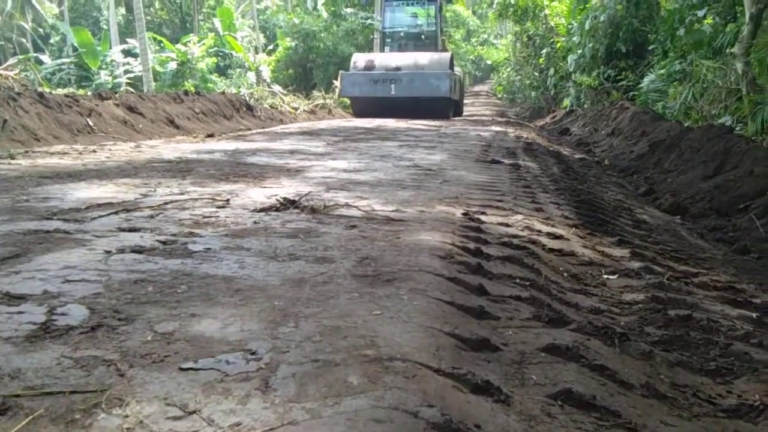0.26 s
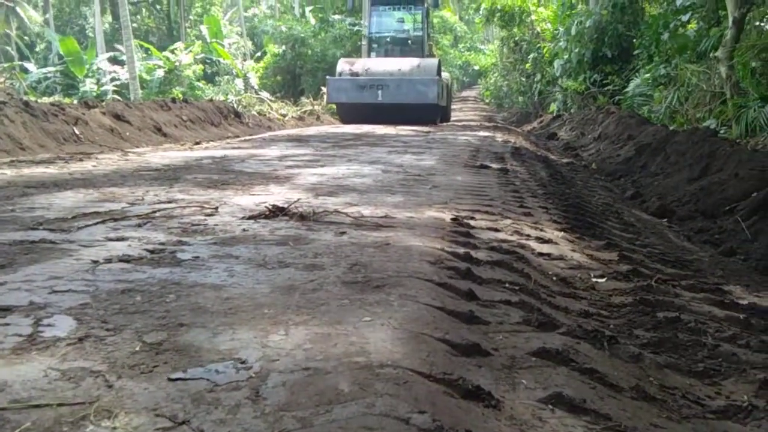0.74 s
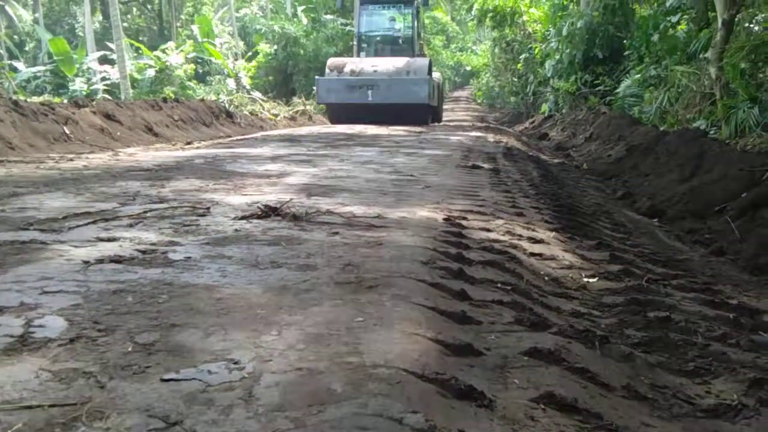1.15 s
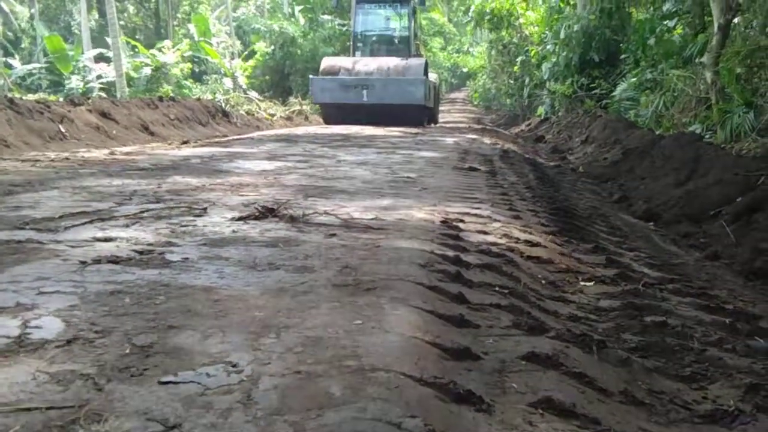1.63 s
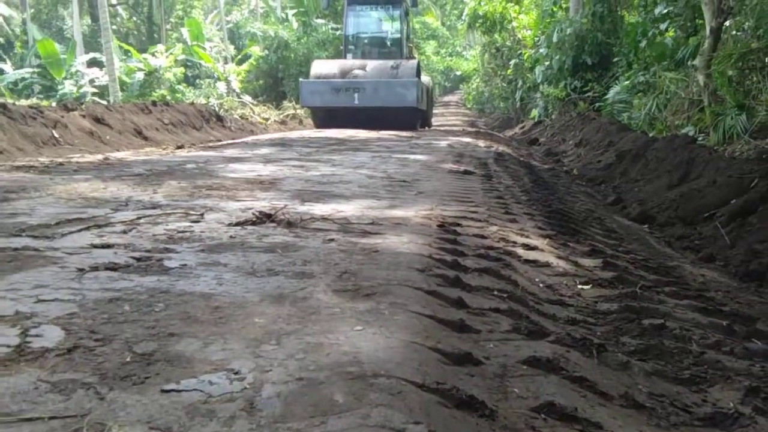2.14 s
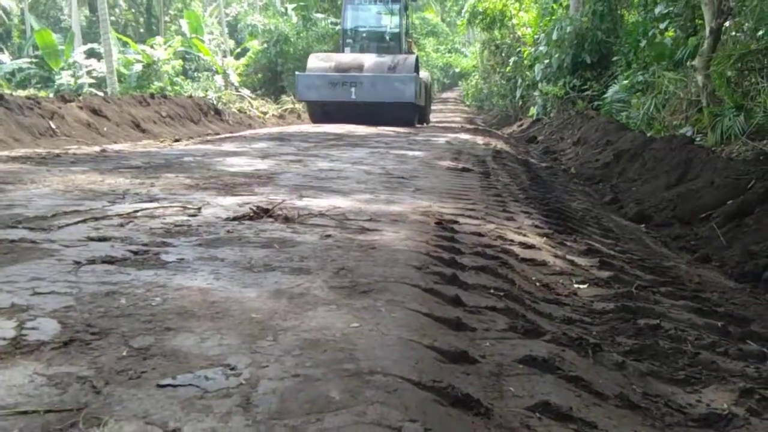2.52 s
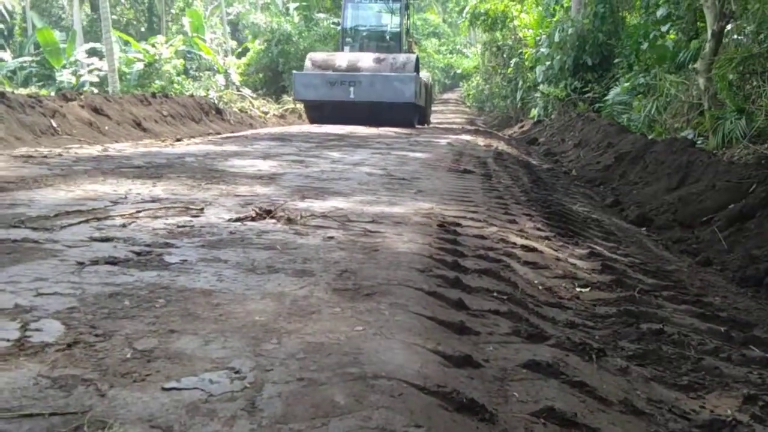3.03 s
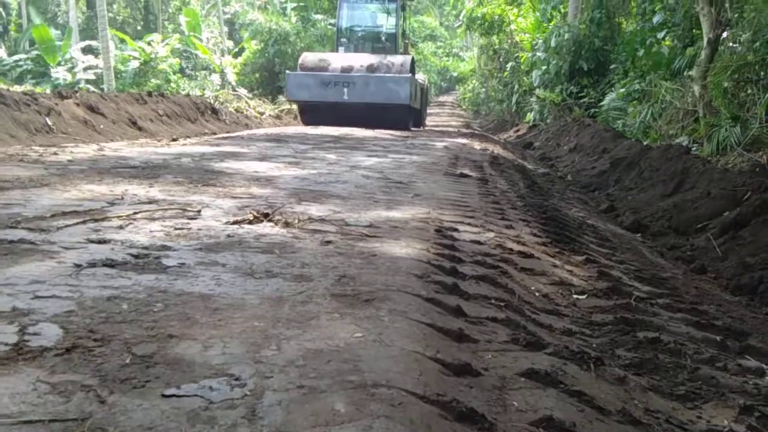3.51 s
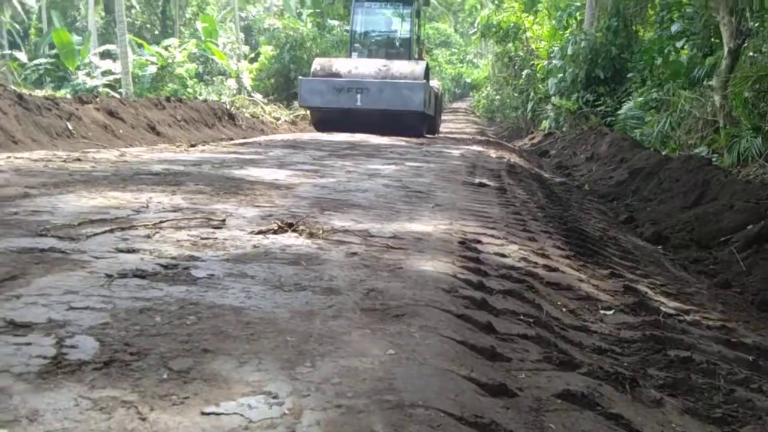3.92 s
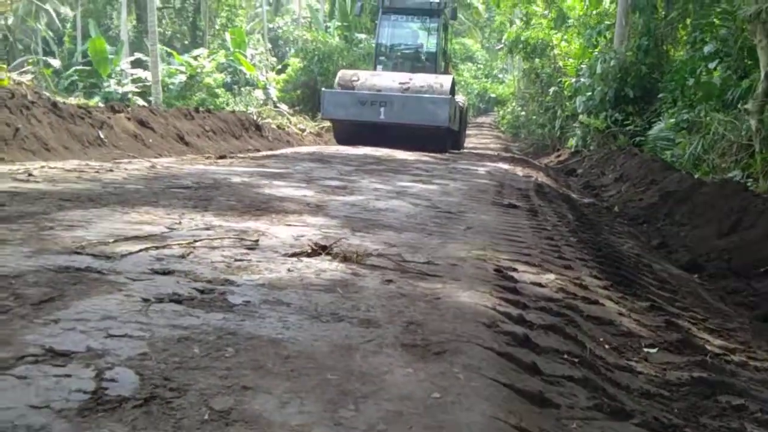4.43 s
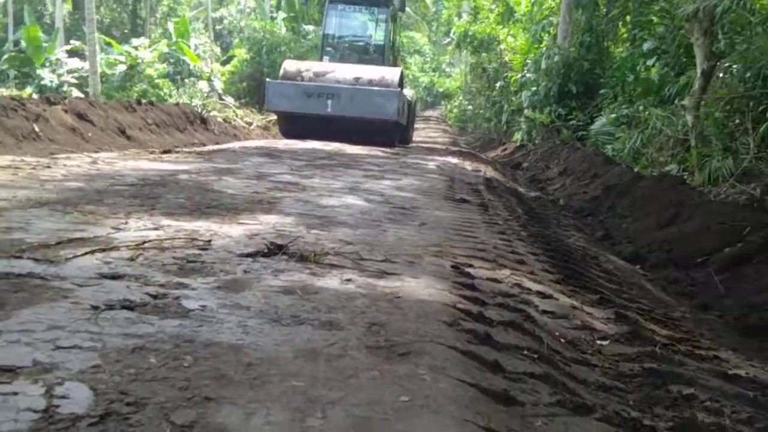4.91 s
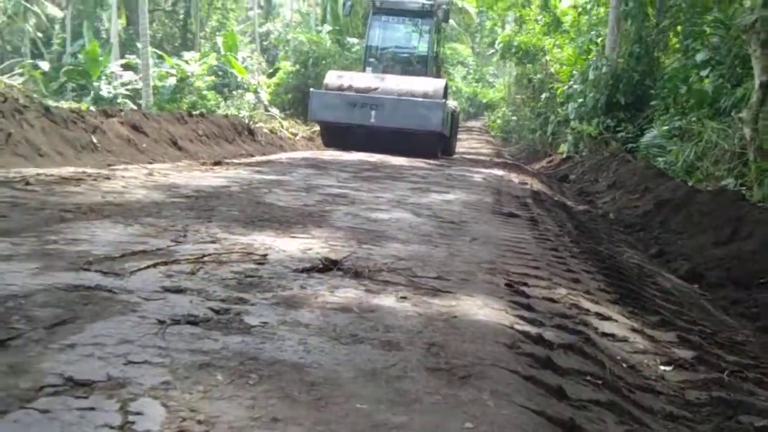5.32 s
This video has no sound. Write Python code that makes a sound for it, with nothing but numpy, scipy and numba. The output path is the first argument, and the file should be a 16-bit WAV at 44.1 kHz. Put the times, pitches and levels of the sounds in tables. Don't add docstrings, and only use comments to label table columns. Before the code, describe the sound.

A heavy vibratory roller is already running at 0 s, about twenty metres away on an open dirt road between trees. A deep, nearly pure diesel hum holds one low pitch with tiny wavering; beneath it the drum throbs and the soil rumbles. Above lie muffled block knocking, thin wavering pump and gear whines, and a steady, soft, bright fan roar. Faint dull wind puffs open the scene, then sharp thumps hit the bare microphone near 0.5 s, 0.65 s and most densely from 0.9 to 1.15 s, fading by about 1.7 s. Softer bumps return around 2.5-3.1 s, 4.2-4.3 s and 5.4 s, leaving the machine exposed between them. The engine keeps its speed but grows gradually louder and nearer, up about two decibels by the end, around 5.5 s. In roughly the last half second, dry leaves rustle close by, a crisp, dense ticking swelling up to the cut.

```python
import sys
import numpy as np
from scipy import signal
from scipy.fft import rfft, irfft
from scipy.io import wavfile
from scipy.ndimage import uniform_filter1d
from numba import njit

SR = 44100
rng = np.random.default_rng(int(sys.argv[2]) if len(sys.argv) > 2 else 0)


def file_out(sig):
    cols = np.atleast_2d(sig).T
    lim = np.clip(cols, -1, 1)
    pcm = np.round(lim * 32767).astype(np.int16)
    wavfile.write(sys.argv[1], SR, pcm)


def natural_amplitude(level_db):
    exponent = np.asarray(level_db, float) / 20
    return 10 ** exponent


N = 245195
TIME = np.arange(N) / SR
CRANK_HZ = 25.837

# centre in Hz, width in Hz.
PANELS = [(990, 58), (1110, 87), (1320, 93), (1530, 78), (2800, 210)]


def unit(x):
    return x / np.sqrt(np.mean(x ** 2))


@njit
def svf(x, hz, width):
    y, band, low = np.empty(len(x)), 0., 0.
    for i in range(len(x)):
        g = np.tan(np.pi * hz[i] / SR)
        k = width / hz[i]
        v = (band + g * (x[i] - low)) / (1 + g * (g + k))
        band = 2 * v - band
        low += 2 * g * v
        y[i] = k * v
    return y


def resonance(x, hz, width):
    return svf(x, np.full(N, float(hz)), float(width))


def low_pass(x, order, hz):
    return signal.sosfilt(signal.butter(order, hz, fs=SR, output="sos"), x)


def walk(rate):
    hold = int(SR / rate)
    steps = np.repeat(rng.standard_normal(300), hold)[:N]
    return 1.3 * uniform_filter1d(uniform_filter1d(steps, hold), hold)


def bands(shape, swell_db, flicker_db):
    hz, db = np.transpose(shape)
    octave = np.log2(np.arange(N // 2 + 1) * SR / N + 1)
    colour = rfft(rng.standard_normal(N)) * natural_amplitude(np.interp(octave, np.log2(hz), db))
    out = np.zeros(N)
    for centre in np.arange(np.log2(hz[0]), np.log2(hz[-1]) + 1 / 3, 1 / 3):
        share = np.clip(1 - 3 * np.abs(octave - centre), 0, 1)
        level = natural_amplitude(swell_db * walk(4.73) + flicker_db * walk(17))
        out += irfft(colour * share, N) * level
    return unit(out)


def breeze():
    return natural_amplitude(-56) * unit(resonance(rng.standard_normal(N), 30, 25))


def leaves():
    ticks_per_s, end_db, rise_db_per_s = 2800, -39, 23.5
    chance = rng.random((2, N))
    size = natural_amplitude(-2.2 * np.log(chance[1] + 0.03)) * rng.standard_normal(N)
    ticks = (chance[0] < ticks_per_s / SR) * size
    rustle = low_pass(resonance(ticks, 6040, 3500), 6, 7300)
    return natural_amplitude(end_db - rise_db_per_s * (N / SR - TIME)) * unit(rustle)


def buffet():
    # centre in seconds, level in dB, half length in seconds.
    gusts = [
        (.1, -41, .2),
        (0.493, -33, 0.033),
        (.65, -33, .06),
        (1.06, -31, 0.41),
        (1.59, -35, 0.18),
        (2.6, -30, 0.12),
        (3.05, -36, 0.21),
        (4.25, -41, 0.26),
        (5.4, -39, 0.23),
    ]
    gust = natural_amplitude(-39.5)
    for centre, db, half in gusts:
        gust = gust + natural_amplitude(db) * np.exp(-((TIME - centre) / half) ** 2)
    pressure = low_pass(resonance(rng.standard_normal(N), 82, 70), 3, 215)
    flutter = natural_amplitude(2.4 * walk(24))
    return gust * flutter * unit(pressure)


def eddy(hz, cycles, snap_db):
    t = np.arange(int(0.1 * SR)) / SR
    span = t * hz / max(cycles, 0.5)
    swing = 2 * np.pi * (hz * t * (1 - 6 * t) + 0.43 * rng.random())
    swell = (2 * span * np.exp(1 - 2 * span)) ** 1.74
    snap = swell ** 1.35 * np.sin(1.954 * swing) + natural_amplitude(-9) * swell ** 3 * np.sin(3.05 * swing)
    return swell * np.sin(swing) + natural_amplitude(snap_db) * snap


def wind():
    # start in seconds, peak in dB, pitch in Hz, length in cycles.
    sharp_eddies = [(.488, -5.5, 112, 1.1), (.503, -28, 100, 1.2), (.617, -29, 150, 1.1),
                    (.627, -13, 137, 1.2), (.646, -13.5, 141, 1.2), (.652, -6.5, 124, 0.69),
                    (.681, -29, 152, 1.1), (.685, -9, 144, 0.88), (0.697, -22, 136, 1.5),
                    (.896, -12.5, 132, 2), (.910, -13.5, 118, 1.05), (.929, -13, 148, 1.2),
                    (.938, -16, 188, 2.1), (.982, -13.5, 105, 2), (1.022, -5, 118, 0.94),
                    (1.034, -10, 150, 1.2), (1.051, -3.5, 125, 0.97), (1.115, -12, 109, 0.65),
                    (1.13, -14.5, 140, 1.2), (1.142, -17, 169, 0.95)]
    # start in seconds, peak in dB, length in cycles.
    soft_eddies = [(0.015, -15, 2.1), (0.089, -14, 2.2), (0.297, -16, 1.8), (0.35, -15.5, 0.95),
                   (1.734, -18, 0.91), (2.536, -16, 1.4), (2.713, -12.5, 0.95), (2.798, -18, 1.7),
                   (3.009, -15.5, 1.2), (3.063, -18, 1.9), (4.083, -27, 1.5), (4.216, -20, 0.89),
                   (4.301, -13, 0.78), (5.422, -20, 1.2)]
    hits = [(s, db, hz, cycles, -6.5 - 9 * (cycles - 1)) for s, db, hz, cycles in sharp_eddies]
    hits += [(s, db, 123, cycles, -30) for s, db, cycles in soft_eddies]
    out = buffet()
    for s, db, hz, cycles, snap_db in hits:
        first = int(s * SR)
        burst = eddy(hz, cycles, snap_db)[:N - first]
        out[first:first + len(burst)] += natural_amplitude(db - 0.5) * burst
    return signal.sosfilt(signal.butter(3, 58, "high", fs=SR, output="sos"), out)


def drum(hum_db, ground_db):
    eccentric_hz, soil_hz, shell_hz = 22.48, 168.2, 178
    throb = natural_amplitude(hum_db - 17 + 0.6 * walk(2.5)) * np.sin(2 * np.pi * eccentric_hz * TIME)
    hz = soil_hz * (1 + 0.024 * walk(4))
    soil = svf(rng.standard_normal(N), hz, 62.)
    soil = svf(svf(soil, 0.99 * hz, 81.), 0.92 * hz, 81.)
    shell = svf(rng.standard_normal(N), shell_hz * (1 + 0.007 * walk(3.47)), 9.4)
    rumble = natural_amplitude(ground_db + 0.66 + 0.46 * walk(20)) * unit(soil)
    return throb + natural_amplitude(ground_db - 3) * unit(shell) + rumble


def cooling_fan(fan_db):
    # frequency in Hz, density in dB per Hz.
    fan_colour = [(1760, -12.5), (3000, -8), (3250, -6.5), (4400, -4.5), (5500, -3), (6700, -0.5),
                  (7200, -3.5), (7700, -10.5), (8000, -12), (8400, -20.5), (9500, -28), (11000, -34.5),
                  (12500, -50.5), (15500, -36)]
    return natural_amplitude(fan_db + 1.32) * bands(fan_colour, swell_db=0.15, flicker_db=0.2)


def machine_noise():
    # frequency in Hz, density in dB per Hz.
    machine_colour = [(150, -26), (240, -19.5), (290, 2.5), (370, 3.5), (440, 0.5), (540, -2.5), (650, -6),
                      (850, -9), (1300, -8.5), (1700, -12), (2300, -13.5), (3000, -15.5), (4300, -38.5)]
    return bands(machine_colour, swell_db=0.8, flicker_db=0)


def block_knock(firing, panel_db):
    cylinder_db = [0, -1, 1, -7, -3.5, -1]
    count = firing.astype(int)
    blow = natural_amplitude(np.array(cylinder_db)[count % 6] + 0.78 * rng.standard_normal(1000)[count])
    knock = blow * (1.3 + np.exp(-(firing % 1) / 0.5)) * rng.standard_normal(N)
    ringing = sum(natural_amplitude(db) * resonance(knock, hz, width) for (hz, width), db in zip(PANELS, panel_db))
    return unit(low_pass(ringing, 6, 3600))


def pump_and_gear_tones(turns, panel_db):
    crank_orders = [2, 4, 6, 9, 10, 13, 15, 18, 20, 23, 30, 33.7, 36, 37.5, 39, 40, 42, 43, 45, 50, 51, 53,
                    54, 56, 57, 58.5, 60, 98.7, 107.9]
    order_db = [-36.5, -23.5, -26.5, -35.5, -29, -49, -38, -33.5, -27, -33, -41.5, -38, -41, -44, -39, -55,
                -38, -44.5, -37, -43, -45.5, -41, -38, -51, -42, -45.5, -46.5, -42.5, -43]
    tones = np.zeros(N)
    for order, db in zip(crank_orders, order_db):
        carried_db = np.zeros(N)
        for (hz, width), level_db in zip(PANELS, panel_db):
            carried_db += (level_db + 4) / (1 + (2 * (order * CRANK_HZ - hz) / width) ** 2)
        level = natural_amplitude(db + 1.04 * carried_db + walk(4.13))
        waver = 0.0021 * order * walk(5)
        tones += level * np.sin(2 * np.pi * (order * turns + rng.random() + waver))
    return tones


def engine(hum_db, noise_db, near_db):
    # level at the start in dB, rise in dB per dB of nearness.
    panel_rise = [(-23.5, 11), (-5, 3.5), (2, -0.8), (-3, 3.4), (-2.5, 1.3)]
    hunt = walk(1.505)
    turns = np.cumsum(CRANK_HZ * (1 + 0.001 * (hunt - hunt.mean()))) / SR
    firing = 3 * turns
    panel_db = [db + rise * near_db + 2.2 * walk(1.4) for db, rise in panel_rise]
    hum = np.sin(2 * np.pi * firing) * natural_amplitude(0.92 * walk(2.01))
    pitched = hum + pump_and_gear_tones(turns, panel_db)
    noise = natural_amplitude(-9.5) * block_knock(firing, panel_db) + natural_amplitude(4) * machine_noise()
    return np.sqrt(2) * natural_amplitude(hum_db) * pitched + natural_amplitude(noise_db) * noise


def scene():
    start_m, speed_m_s = 20, 0.88
    near_db = -20 * np.log10(1 - speed_m_s * TIME / start_m)
    hum_db = -22.5 + 1.08 * near_db
    noise_db = -40.5 + 0.33 * near_db
    fan_db = -42 + 0.74 * near_db
    ground_db = -33.5 + 0.083 * near_db
    air = breeze() + leaves() + wind()
    roller = drum(hum_db, ground_db) + cooling_fan(fan_db) + engine(hum_db, noise_db, near_db)
    return (air + roller)[None]


def band_limit(x):
    return signal.sosfilt(signal.butter(12, 15504, fs=SR, output="sos"), x)


def record(dry):
    return band_limit(dry)


dry = scene()
out = record(dry)
file_out(out)
```